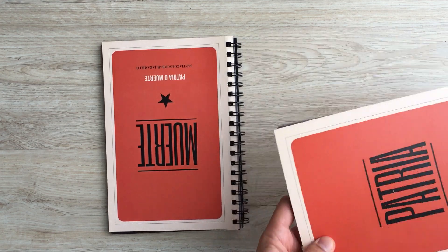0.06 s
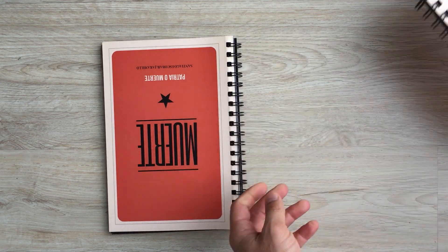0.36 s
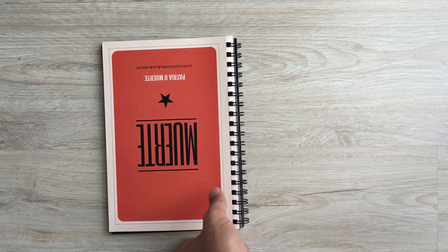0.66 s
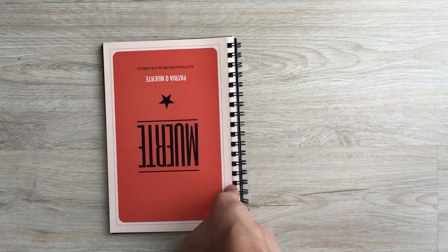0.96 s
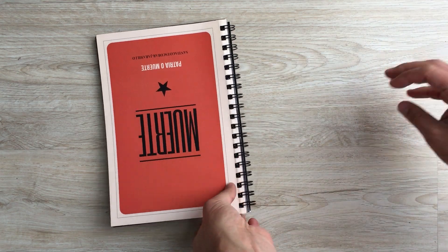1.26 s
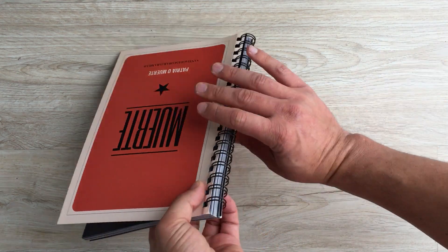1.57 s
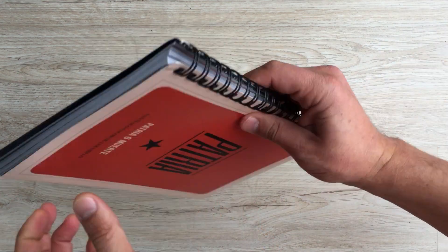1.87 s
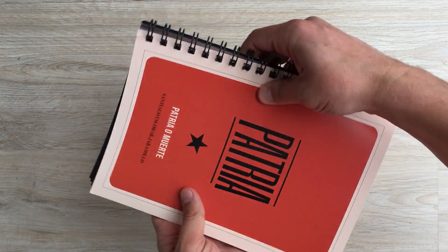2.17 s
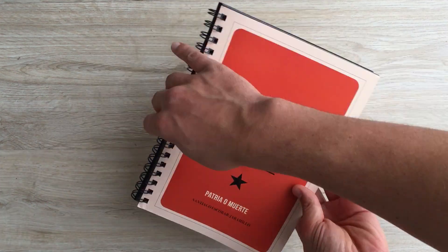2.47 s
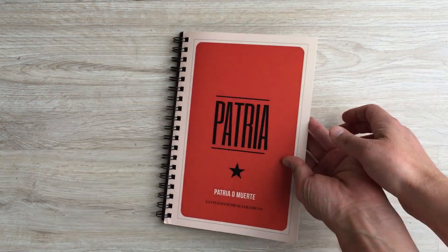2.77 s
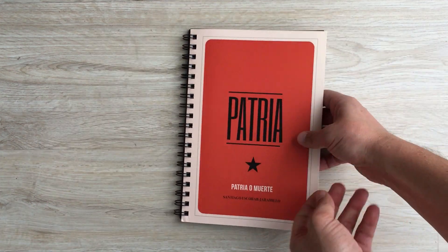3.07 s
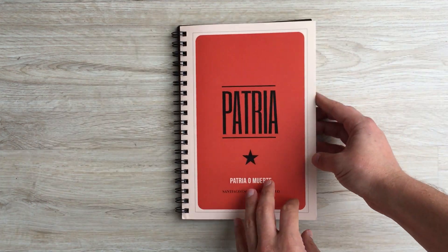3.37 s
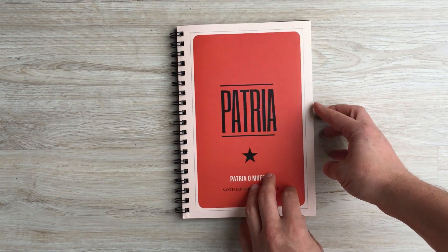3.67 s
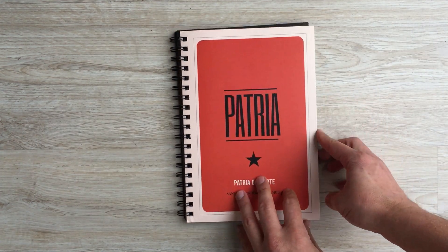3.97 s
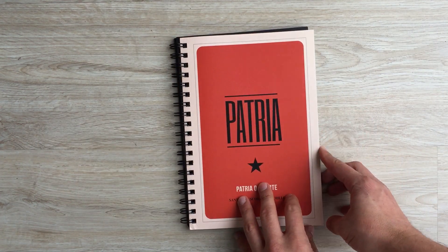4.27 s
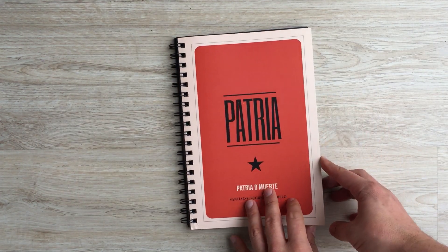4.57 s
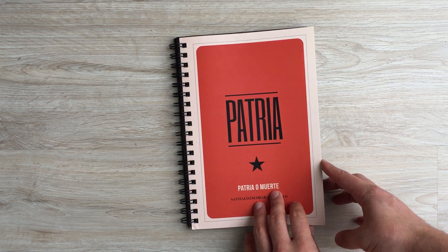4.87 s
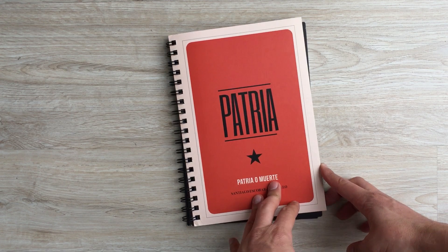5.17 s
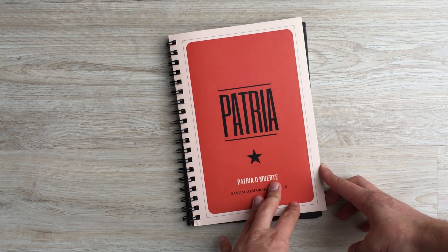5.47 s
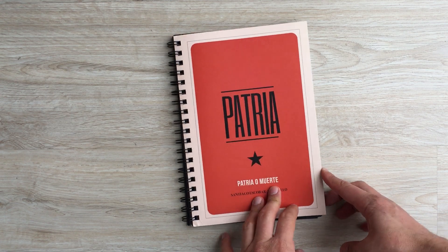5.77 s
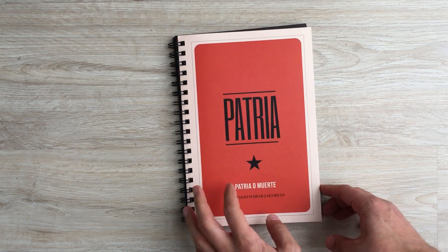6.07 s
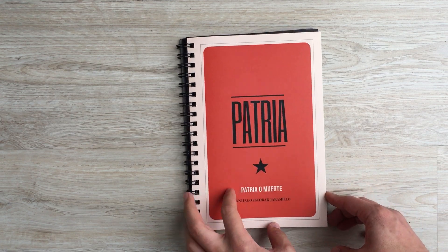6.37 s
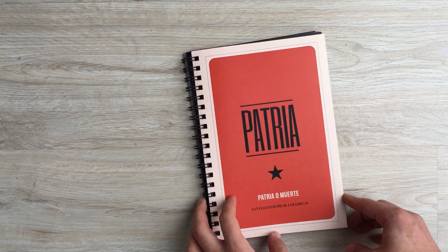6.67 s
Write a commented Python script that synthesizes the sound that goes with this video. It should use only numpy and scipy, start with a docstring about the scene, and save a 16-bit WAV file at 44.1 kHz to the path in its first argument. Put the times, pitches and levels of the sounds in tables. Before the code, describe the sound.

Spiral-bound books are turned and stacked on a wooden table, with knocks, clacking wire bindings and rustling card covers.

```python
"""In a small quiet room, two spiral-bound books are lifted, turned and stacked on a wooden table.
Their edges knock on the table top and make it ring. The wire bindings clack and tick, and the card
covers rustle, hiss and rasp as they slide under the hands and over each other.
Near the end a puff of air buffets the microphone."""
import sys
import numpy as np
from scipy import signal
from scipy.fft import rfft, irfft, next_fast_len
from scipy.io import wavfile

SR = 44100
rng = np.random.default_rng(int(sys.argv[2]) if len(sys.argv) > 2 else 0)


def master_out(mix):
    """Clip the mix to full scale and print it as 16-bit PCM to the path in sys.argv[1]."""
    frames = np.transpose(np.atleast_2d(mix))
    ceiling = np.clip(frames, -1, 1)
    pcm = np.round(ceiling * 32767).astype(np.int16)
    wavfile.write(sys.argv[1], SR, pcm)


N = 300321
T = np.arange(N) / SR
BRIEF, RING = T[:SR // 2], T[:SR // 4]  # clocks for short sounds, in seconds


def from_db(db):
    """Turn decibels into a gain."""
    return 10 ** (np.asarray(db) / 20)


def rms_one(x):
    """Scale to an average power of one."""
    return x / np.sqrt(np.mean(x ** 2) + 1e-20)


def peak_one(x):
    """Scale to a peak of one."""
    return x / np.abs(x).max()


def add(track, s, sound):
    """Mix a sound in at s seconds."""
    start = max(round(s * SR), 0)
    track[start:start + len(sound)] += sound[:N - start]


def gain_curve(rows, fade_s=0.028):
    """Join (seconds, dB) points into a gain that fades away at both ends."""
    s, db = np.transpose(rows)
    outside_s = np.abs(T - np.clip(T, s[0], s[-1]))
    return from_db(np.interp(T, s, db)) * np.exp(-outside_s / fade_s)


def gestures(rows, shape=1.2):
    """Each hand movement swells and dies away; shape 1 is pointed, 2 is a bell."""
    t, gain = T[::64], 0
    for s, rise, fall, db in rows:
        distance = np.abs((t - s) / np.where(t < s, rise, fall))
        gain += from_db(db) * np.exp(-np.minimum(distance, 20) ** shape)
    return np.interp(T, t, gain)


def at_hz(points, hz):
    """Read between (Hz, value) points, with octaves evenly spaced."""
    f, value = np.transpose(points)
    return np.interp(np.log(hz), np.log(f), value)


def coloured(x, points, tilt_db=0, ripple_db=0, ripple_hz=230):
    """Give a sound a tone colour, with an optional tilt per octave and random resonances."""
    size = 2 * next_fast_len(len(x) // 2 + 1, real=True)
    hz = np.maximum(np.fft.rfftfreq(size, 1 / SR), 10)
    slope = tilt_db * np.log2(np.maximum(hz, SR / 44))
    ripple = ripple_db * np.interp(hz / ripple_hz, np.arange(400), rng.standard_normal(400))
    gain = rms_one(from_db(at_hz(points, hz) + slope + ripple))
    # minimum phase: the filter rings after a click, never before it
    cepstrum = irfft(np.log(gain))
    cepstrum[1:size // 2] *= 2
    cepstrum[size // 2 + 1:] = 0
    return irfft(rfft(x, size) * np.exp(rfft(cepstrum)))[:len(x)]


def ringing(modes):
    """A blow starts tones of random sign; each falls 60 dB in its ring time, t60."""
    return sum(rng.choice([-1, 1]) * from_db(db - 60 * RING / t60) * np.sin(2 * np.pi * hz * RING)
               for hz, db, t60 in modes)


def friction(slips_per_s, uneven_db, catch_hz, catch_db):
    """Fibres slip at random, in clumps as the surfaces catch and let go."""
    slips = (rng.random(N) < slips_per_s / SR) * rng.choice([-1, 1], N)
    force_db = uneven_db * np.minimum(rng.exponential(1, N), 4)
    clumps = np.interp(T * catch_hz, np.arange(N), rng.standard_normal(N))
    return rms_one(slips * from_db(force_db + catch_db * clumps))


# The room's background noise. Each row: pitch in Hz, relative level in dB.
HUSH_COLOUR = [(20, -38), (32, -26), (45, -2), (65, 4), (100, -2), (160, -8), (280, -7.5), (500, -15),
               (1000, -17.5), (2000, -16.5), (4000, -22.5), (8000, -28.5), (12000, -29), (16000, -34.5)]
def hush(level_db=-68):
    """The quiet room has a faint, steady, low noise."""
    return from_db(level_db) * coloured(rng.standard_normal(N), HUSH_COLOUR)


# How long the room echoes. Each row: pitch in Hz, ring time in seconds.
ROOM_DECAY = [(100, 0.17), (400, 0.24), (1200, 0.33), (4000, 0.21), (8000, 0.34), (16000, 0.25)]
def room_echo(x, wet_db=-10.5, gap_s=0.0068, build_s=0.0009):
    """Reflections build up after a short gap and die away, each octave at its own pace."""
    tail, edges = np.zeros(len(BRIEF)), np.geomspace(70, 18000, 9)
    for low, high in zip(edges, edges[1:]):
        octave = signal.butter(2, [low, high], "band", fs=SR, output="sos")
        band = signal.sosfilt(octave, rng.standard_normal(len(BRIEF)))
        tail += band * from_db(-60 * BRIEF / at_hz(ROOM_DECAY, np.sqrt(low * high)))
    tail *= 1 - np.exp(-np.maximum(BRIEF - gap_s, 0) / build_s)
    return from_db(wet_db) * signal.fftconvolve(x, tail / np.linalg.norm(tail))[:N]


# The puff's strength. Each row: time in seconds, level in dB.
PUFF_LEVELS = [(6.40, -74.5), (6.48, -57), (6.53, -38.5), (6.59, -48.5), (6.612, -34), (6.65, -41),
               (6.70, -50), (6.76, -48.5), (6.81, -61)]
# Its tone. Each row: pitch in Hz, relative level in dB.
PUFF_COLOUR = [(20, -34), (31, -12), (40, -4), (55, -4.5), (80, -1), (125, -9), (220, -18.5), (400, -39),
               (900, -83)]
def air_puff():
    """Air hits the microphone with a low rumble."""
    return gain_curve(PUFF_LEVELS) * coloured(rng.standard_normal(N), PUFF_COLOUR)


# Hands gliding. Each row: middle in seconds, half-length in seconds, relative level in dB.
GLIDES = [(0, 0.026, -63.5), (0.298, 0.052, -65), (0.689, 0.029, -64.5), (1.085, 0.04, -61),
          (1.15, 0.036, -52.5), (2.14, 0.023, -62), (2.394, 0.085, -65.5), (2.626, 0.027, -65.5),
          (3.078, 0.054, -52), (4.168, 0.15, -71), (5.38, 0.34, -68), (6.38, 0.037, -62.5),
          (6.712, 0.047, -65)]
# Their hiss. Each row: pitch in Hz, relative level in dB.
HISS_COLOUR = [(3000, -32), (6000, 2.5), (7500, 1.5), (10000, -4), (13000, 1.5), (16000, -5)]
def skin_glides(gain_db=-2):
    """Skin hisses over the glossy covers."""
    swell = gestures([(s, half, half, db) for s, half, db in GLIDES])
    return from_db(gain_db) * swell * coloured(rng.standard_normal(N), HISS_COLOUR)


def card_colour(hz, sharp_db):
    """A patch of card favours one pitch, which stands sharp_db above its neighbours."""
    return [(hz / 4, -sharp_db - 17), (hz / 1.35, -sharp_db), (hz, 0),
            (hz * 1.35, -sharp_db), (hz * 2.2, -sharp_db - 4), (hz * 5, -sharp_db - 18)]


# Short pitched rubs and rattles. Each row: middle in seconds, level in dB, half-length in seconds,
# pitch in Hz, sharpness of that pitch in dB.
RUBS_AND_RATTLES = [(1.243, -49, 0.042, 1060, 31), (1.554, -56.5, 0.052, 1640, 14.5),
                    (1.652, -59.5, 0.12, 2900, 14.5), (1.745, -55.5, 0.037, 1510, 11),
                    (2.184, -57, 0.036, 1350, 10.5), (2.367, -60, 0.059, 1430, 11.5),
                    (2.86, -49, 0.059, 4000, 17), (3.076, -54, 0.021, 1580, 4),
                    (4.585, -69, 0.083, 3070, 14), (4.794, -68.5, 0.052, 2660, 14),
                    (5.077, -53, 0.013, 970, 12.5), (6.14, -65, 0.017, 1980, 12),
                    (6.447, -59.5, 0.031, 3390, 8.5), (6.71, -58, 0.052, 3320, 8.5)]
def rubs_and_rattles():
    """Tiny slips swell and fade around one pitch as a cover is rubbed or a book settles after a knock."""
    out, middle = np.zeros(N), BRIEF.mean()
    slips = friction(slips_per_s=6000, uneven_db=1.5, catch_hz=130, catch_db=2.2)
    for s, db, half, hz, sharp_db in RUBS_AND_RATTLES:
        grain = slips[rng.integers(N - len(BRIEF)):][:len(BRIEF)]
        voiced = coloured(grain, card_colour(hz, sharp_db), ripple_db=3)
        swell = np.exp(-.5 * np.abs((BRIEF - middle) / half) ** 3)
        add(out, s - middle, from_db(db) * swell * voiced)
    return out


# Pushes on a book. Each row: fastest moment, speed-up time and slow-down time in seconds,
# then relative levels of drag and rustle in dB.
SLIDES = [(0, .05, 0.083, -72.5, -64.5), (.2, 0.086, .14, -77.5, -64.5), (.77, 0.034, 0.14, -61.5, -64.5),
          (1.146, 0.11, 0.06, -49.5, -44), (1.29, 0.027, 0.087, -59, -50.5), (1.61, 0.047, 0.043, -76, -52),
          (1.755, .05, 0.024, -54.5, -52), (1.9, .03, 0.043, -78, -55), (2.27, 0.13, 0.23, -77, -70.5),
          (2.68, .08, 0.14, -62.5, -54), (2.96, 0.095, 0.07, -53.5, -51), (3.17, .05, 0.25, -62.5, -62),
          (3.75, 0.055, 0.26, -59, -72), (3.89, 0.039, 0.034, -60, -71), (4.091, 0.051, 0.15, -66.5, -59.5),
          (4.98, 0.065, 0.19, -55.5, -61), (5.26, 0.073, 0.051, -60, -56.5),
          (5.53, 0.15, 0.085, -55, -56.5), (5.93, 0.069, 0.22, -67.5, -61), (6.384, 0.042, 0.038, -63, -60),
          (6.7, 0.052, 0.095, -68.5, -61.5)]
# The tones of drag and rustle. Each row: pitch in Hz, relative level in dB.
DRAG_COLOUR = [(120, -29), (250, -13), (350, 1), (430, -8.5), (530, -1.5), (680, -8.5), (830, -12),
               (1050, -11.5), (1500, -46.5), (3000, -49.5)]
RUSTLE_COLOUR = [(500, -19.5), (1000, 5.5), (1400, 0.5), (1800, 0), (2300, 3), (3100, 3.5), (4200, 0.5),
                 (6500, -9), (9000, -8.5), (16000, -69.5)]
def book_slides(drag_db=1, rustle_db=-4):
    """Coarse slips shake the table; finer ones rustle in the card."""
    coarse = friction(slips_per_s=1200, uneven_db=2.0, catch_hz=70, catch_db=2.2)
    fine = friction(slips_per_s=9000, uneven_db=2.0, catch_hz=110.2, catch_db=2.5)
    on_table = gestures([(s, rise, fall, db) for s, rise, fall, db, _ in SLIDES])
    on_card = gestures([(s, rise, fall, db) for s, rise, fall, _, db in SLIDES])
    drag = on_table * coloured(coarse, DRAG_COLOUR)
    rustle = on_card * coloured(fine, RUSTLE_COLOUR, ripple_db=4.5)
    return from_db(drag_db) * drag + from_db(rustle_db) * rustle


# One firm shove. Each row: time in seconds, level in dB.
SHOVE_LEVELS = [(5.36, -71), (5.408, -41.5), (5.417, -37), (5.46, -33), (5.485, -37.5), (5.505, -46),
                (5.55, -51.5), (5.58, -91)]
# Its tone. Each row: pitch in Hz, relative level in dB.
SHOVE_COLOUR = [(120, -45), (200, -13.5), (340, -35), (500, 1.5), (709, 3.5), (1100, -3.5), (1230, -2.5),
                (1590, -8), (1740, -1), (1870, -10.5), (2250, -5.5), (3190, -10), (3760, -8), (14300, -35),
                (16000, -32.5)]
def book_shove():
    """The pressed upper book rasps over the one below."""
    slips = friction(slips_per_s=4000, uneven_db=1.0, catch_hz=200.2, catch_db=1.4)
    return gain_curve(SHOVE_LEVELS) * coloured(slips, SHOVE_COLOUR)


# Covers twanging. Each row: start in seconds, level in dB, pitch in Hz, ring time in seconds.
TWANGS = [(0.661, -47.5, 2180, 0.029), (2.8041, -21.5, 1690, 0.019), (3.599, -39.5, 1165, 0.023),
          (5.613, -36.5, 2840, 0.046)]
def cover_twangs(onset_s=0.00048):
    """A stiff cover vibrates briefly at one pitch."""
    out = np.zeros(N)
    for s, db, hz, t60 in TWANGS:
        add(out, s, ringing([(hz, db, t60)]) * (1 - np.exp(-RING / onset_s)))
    return out


# Wire loops ticking in their holes. Each row: start in seconds, relative level in dB, pitch in Hz.
TICKS = [(.166, -50, 2730), (.208, -54, 2740), (0.954, -42, 3000), (1.101, -42, 3960), (1.49, -51.5, 3550),
         (1.613, -46.5, 2630), (2.059, -47, 2920), (2.1607, -45, 2680), (2.174, -47, 3840),
         (2.2, -45.5, 3170), (2.2495, -49, 6490), (3.242, -47, 1630), (3.599, -50.5, 1900),
         (3.9495, -47, 3560), (4.5212, -48, 3120), (4.5864, -51.5, 3400), (4.8589, -47.5, 4260),
         (5.118, -49, 4000), (5.766, -53, 3240), (6.256, -54, 4200), (6.29, -53.5, 4440),
         (6.568, -49, 2900)]
def loop_ticks(t60=0.045, gain_db=5, sharp_db=9, snap_s=0.00082, snap=0.87):
    """A single loop snaps against the card with a very short crack."""
    out = np.zeros(N)
    fading = from_db(-60 * BRIEF / t60) + snap * np.exp(-BRIEF / snap_s)
    for s, db, hz in TICKS:
        burst = fading * rng.standard_normal(len(BRIEF))
        crack = coloured(burst, card_colour(hz, sharp_db), ripple_db=2)
        add(out, s, from_db(db + gain_db) * peak_one(crack))
    return out


def buzzing(modes, flutter_hz=380):
    """Ringing loops chatter in their holes, which roughens their tone."""
    flutter = np.interp(RING * flutter_hz, np.arange(len(RING)), rng.standard_normal(len(RING)))
    wire = ringing(modes) * (1 + .5 * flutter)
    return wire / np.linalg.norm(wire)


# The wire spiral's tones. Each row: pitch in Hz, relative level in dB, ring time in seconds.
WIRE_TONES = [(2870, 9, 0.095), (3440, -13, 0.053), (3690, 5, 0.17), (5350, 15, 0.065), (5470, -3, 0.29),
              (5630, -13.5, 0.12), (5500, -9.5, .18), (5960, -0.5, 0.16), (9800, -18, 0.091),
              (11200, -7, .06), (14900, 1, 0.07)]
def spiral_ring(start_s=.8448, peak_db=-23, detune=.022, bright_db=3.5, count=6):
    """One bare blow on the binding rings several loops, each at a slightly different pitch."""
    out, loops = np.zeros(N), 0
    for offset in np.linspace(-1, 1, count):
        loops += buzzing([(hz * (1 + detune * offset), db + bright_db * np.log2(hz), t60)
                          for hz, db, t60 in WIRE_TONES])
    add(out, start_s, from_db(peak_db) * peak_one(loops))
    return out


# Loops and cover edges clacking. Each row: loudest moment in seconds, level in dB,
# build-up and ring time in seconds, treble tilt in dB per octave.
CLACKS = [(0.126, -50, 0.0021, 0.12, -1.5), (.145, -47, 0.00078, 0.064, -2),
          (0.8445, -32, 0.00029, 0.05, 2), (.978, -42, 0.0022, 0.22, -1.5),
          (1.011, -39.5, 0.0016, 0.037, 1.5), (1.1982, -16, 0.00051, 0.023, -9),
          (1.273, -40, 0.0011, 0.18, -4.5), (1.868, -41.5, 0.0045, 0.063, 2),
          (2.315, -50.5, 0.0093, 0.083, 1), (2.613, -49, 0.0042, 0.1, -5.5), (2.675, -38, 0.0031, 0.072, 0),
          (2.774, -27.5, 0.00038, 0.047, 3), (2.796, -21.5, 0.0056, 0.042, 2.5),
          (3.116, -45.5, 0.004, .15, -1.5), (3.146, -40, .005, 0.064, -2.5),
          (3.248, -49.5, 0.0058, .11, -7), (3.677, -53.5, .002, 0.14, -3),
          (3.690, -40.5, 0.000498, 0.052, -9.5), (4.988, -46.5, 0.0073, 0.057, -2),
          (5.615, -44, .016, 0.076, -1), (5.927, -49, 0.00087, 0.04, -4), (6.062, -51, 0.0043, 0.041, 2.5)]
# Their tone. Each row: pitch in Hz, relative level in dB.
CLACK_COLOUR = [(300, -32.5), (700, -0.5), (1100, 3), (1750, 6), (2250, 2), (2900, 7.5), (4000, 5),
                (6300, 1.5), (8300, -2), (10000, -3.5), (16000, -13)]
def binding_clacks(grain_db=3.5, ring_db=-29.5):
    """Many loops land in quick succession; the crowd of clicks faintly rings the spiral."""
    out = np.zeros(N)
    for s, db, build, t60, tilt_db in CLACKS:
        lead = 3 * build
        t = BRIEF - lead
        swell = np.where(t < 0, np.exp(-np.abs(t / build)), from_db(-60 * np.abs(t) / t60))
        noise, force = rng.standard_normal((2, len(t)))
        clicks = rms_one(noise * from_db(grain_db * force) * swell) * np.sqrt(np.mean(swell ** 2))
        crack = coloured(clicks, CLACK_COLOUR, tilt_db, ripple_db=2.0)
        ring = rms_one(signal.fftconvolve(clicks, buzzing(WIRE_TONES))[:len(t)]) * clicks.std()
        add(out, s - lead, from_db(db) * (crack + from_db(ring_db) * ring))
    return out


def radiated(x, edge_hz):
    """A board gives off little sound below its lowest tones."""
    return signal.sosfilt(signal.butter(2, edge_hz, "high", fs=SR, output="sos"), x)


# Book edges hitting the table. Each row: start in seconds, level in dB, favoured pitch in Hz,
# spread around it in octaves, thump in dB relative to the knock, number of touches.
KNOCKS = [(.332, -53, 327, 0.29, -21, 2), (.736, -39.5, 496, 0.47, -40, 2),
          (.846, -31, 645, 0.26, -16.5, 3), (.978, -32, 570, 0.19, -42, 1), (1.0405, -37, 630, 0.2, -37, 1),
          (1.1968, -31, 242.4, 0.17, -20, 1), (1.1972, -17.5, 614, 0.25, -22, 1),
          (1.1973, -17, 1150, .35, -32, 1), (1.228, -39, 1200, 0.43, -31, 2),
          (1.273, -31, 680, 0.55, -40, 1), (1.76, -47.5, 485, 0.4, -9, 1), (1.875, -47.5, 340, 0.79, -1, 1),
          (1.924, -51, 700, 0.3, -2, 1), (2.513, -50.5, 608, 0.15, -20, 1),
          (2.621, -41.5, 488, 0.32, -31, 1), (2.681, -37.5, 490, 0.63, -34, 3),
          (2.7745, -28.5, 546, 0.38, -37, 1), (2.793, -24, 660, .65, -33, 1),
          (2.9191, -33, 510, 0.46, -20, 2), (2.953, -34.5, 580, 0.4, -25.5, 2),
          (3.137, -28, 458, 0.29, -16.5, 1), (3.249, -30.5, 410, 0.33, -14.5, 1),
          (3.601, -44.5, 220, 0.16, 3.5, 1), (3.6897, -30, 956, 0.23, 0.5, 1),
          (3.6901, -22.5, 353, 0.31, -20, 1), (4.034, -45.5, 453, 0.77, -33, 1),
          (4.117, -45.5, 432, 0.16, -28, 1), (4.925, -38.5, 290, .55, -3.5, 3),
          (4.987, -38, 420, 1.2, 2.5, 1), (5.061, -41.5, 434, 0.26, -17, 1),
          (5.2364, -35, 450, 0.44, -35, 1), (5.443, -39, 400, 0.84, -9, 1),
          (5.6143, -31.5, 612, 0.13, -5.5, 1), (5.7643, -38.5, 593, 0.47, -34.5, 1),
          (6.254, -48, 696, .43, -9, 1), (6.567, -38.5, 580, 0.54, -19, 1)]
# The table's tones, then the deep ones of its whole top flexing.
# Each row: pitch in Hz, relative level in dB, ring time in seconds.
TABLE_TONES = [(203, 2, 0.12), (274.6, 2.5, 0.063), (331.5, -4.5, 0.23), (365.7, -4, 0.11),
               (400, -2.5, 0.073), (456, 0, 0.056), (523, 1, 0.053), (589, 0.5, 0.033), (685.3, 0, 0.059),
               (853, -2, 0.045), (972, 2, 0.046), (1144, 1, 0.038), (1244, -6.5, 0.1), (1570, -29.5, .02),
               (1870, 3, 0.038), (2470, -11.5, .025)]
THUMP_TONES = [(88, -3.5, 0.075), (113, -6.5, 0.1), (163, 4.5, 0.031)]
def table_knocks(rebound_s=.0175, rebound_loss_db=2, far_tones_db=-26, contact_cycles=0.43):
    """How an edge lands decides which tones answer; a rocking book lands again, more weakly."""
    board, thump = np.zeros((2, N))
    hz, tone_db, t60 = np.transpose(TABLE_TONES)
    for s, db, centre_hz, spread, thump_db, touches in KNOCKS:
        favour = np.exp(-.5 * (np.log2(hz / centre_hz) / spread) ** 2) + from_db(far_tones_db)
        struck_db = tone_db + 20 * np.log10(favour)
        # a softer contact is lower in pitch and takes longer to press home
        pressing = 1 - np.exp(-RING * centre_hz / contact_cycles)
        for k in range(round(touches)):
            start, gain = s + k * rebound_s, from_db(db - k * rebound_loss_db)
            add(board, start, gain * peak_one(pressing * ringing(zip(hz, struck_db, t60))))
            add(thump, start, gain * from_db(thump_db) * peak_one(pressing * ringing(THUMP_TONES)))
    return radiated(board, edge_hz=230) + radiated(thump, edge_hz=70)


def scene():
    """The books and their echo, over the room's hush, with the puff of air close up."""
    hits = table_knocks() + binding_clacks() + spiral_ring() + loop_ticks() + cover_twangs()
    rubbing = rubs_and_rattles() + book_slides() + skin_glides() + book_shove()
    books = hits + rubbing
    return (hush() + air_puff() + room_echo(books) + books)[None]


def record(dry):
    """The highest treble is cut steeply."""
    cutoff_hz = 15900
    return signal.sosfilt(signal.ellip(12, .1, 80, cutoff_hz, fs=SR, output="sos"), dry)


dry = scene()
out = record(dry)
master_out(out)
```